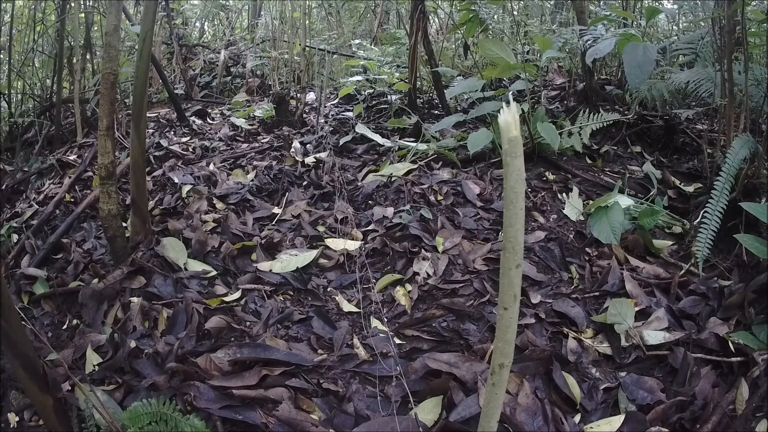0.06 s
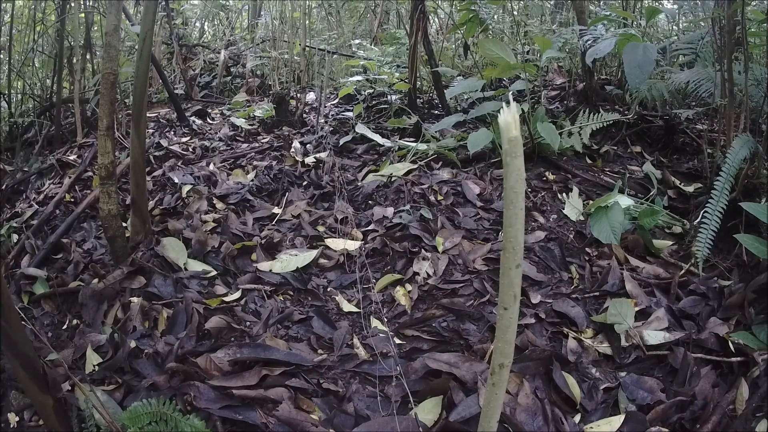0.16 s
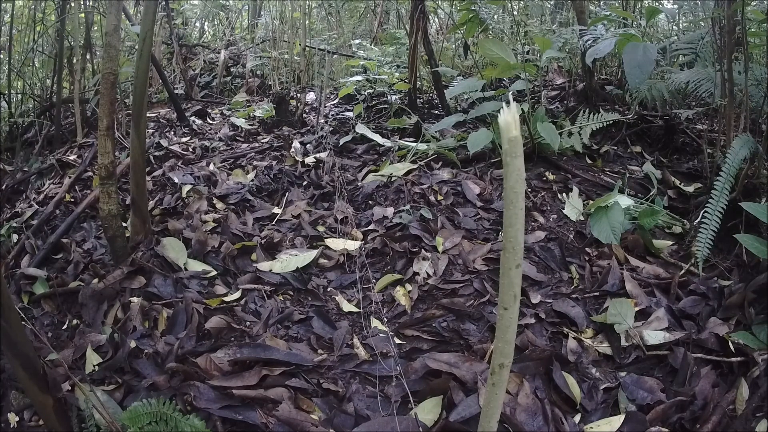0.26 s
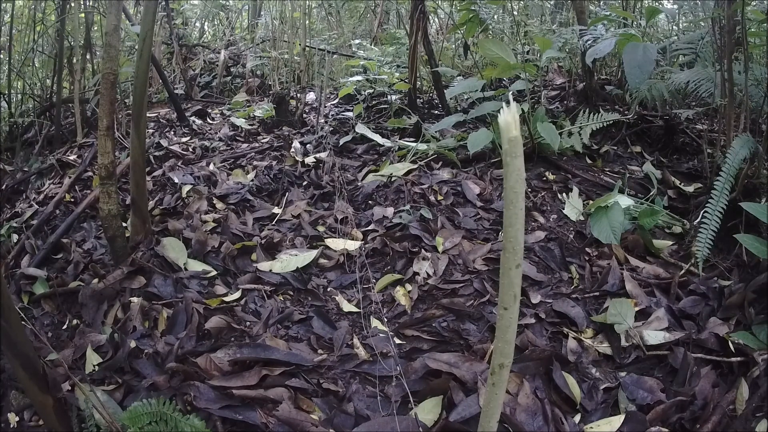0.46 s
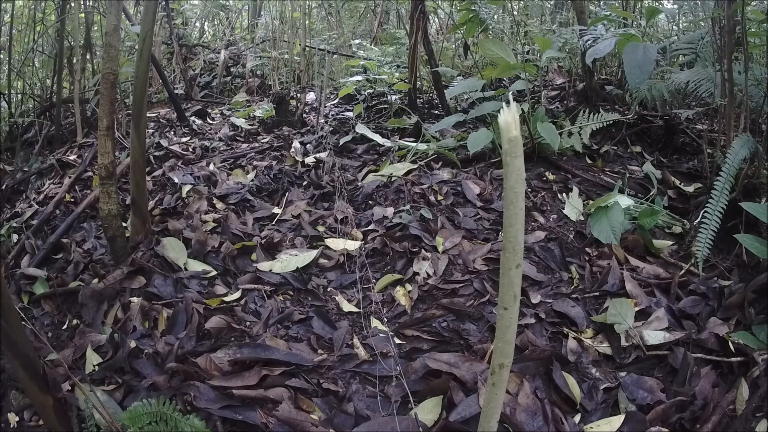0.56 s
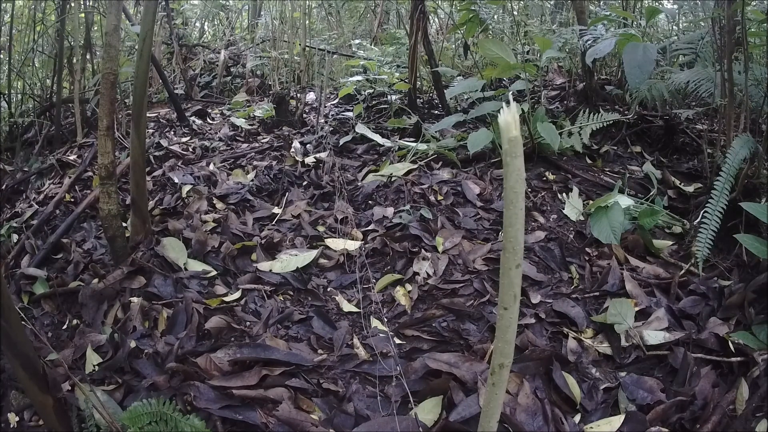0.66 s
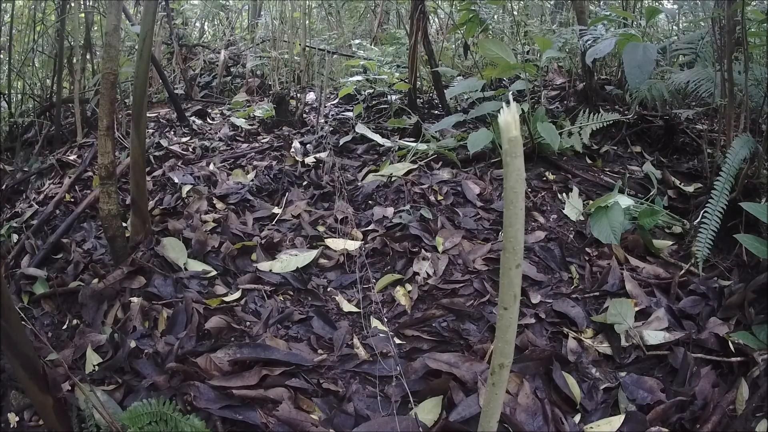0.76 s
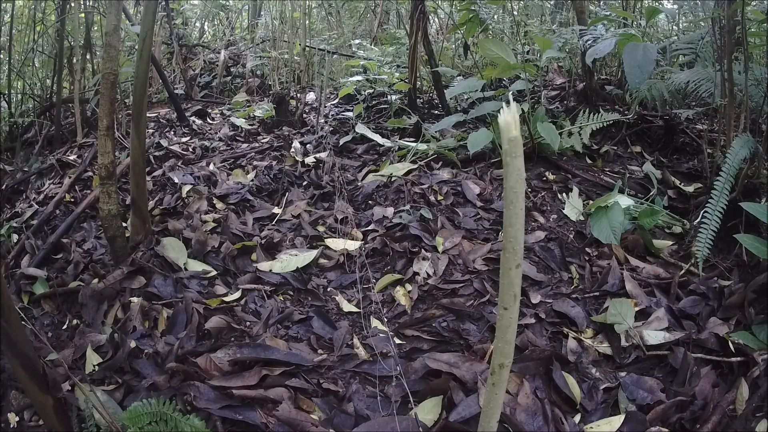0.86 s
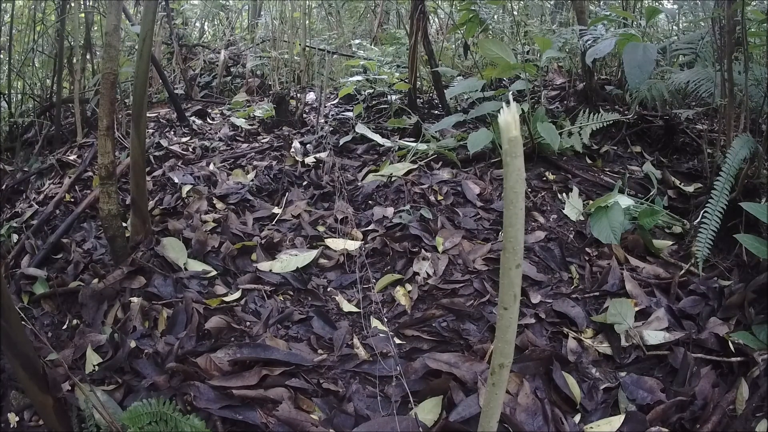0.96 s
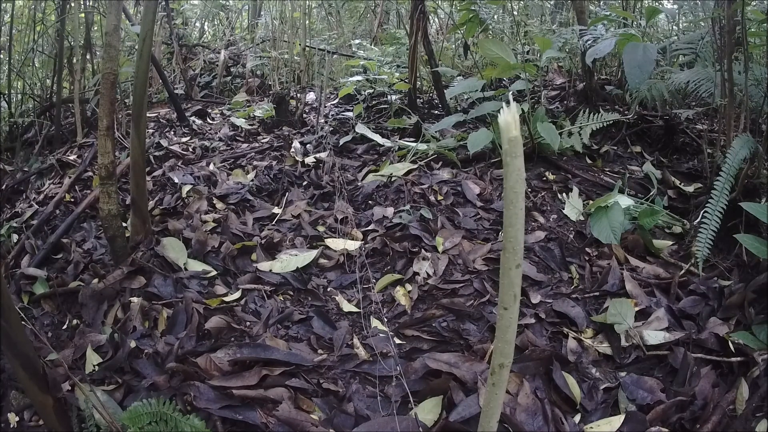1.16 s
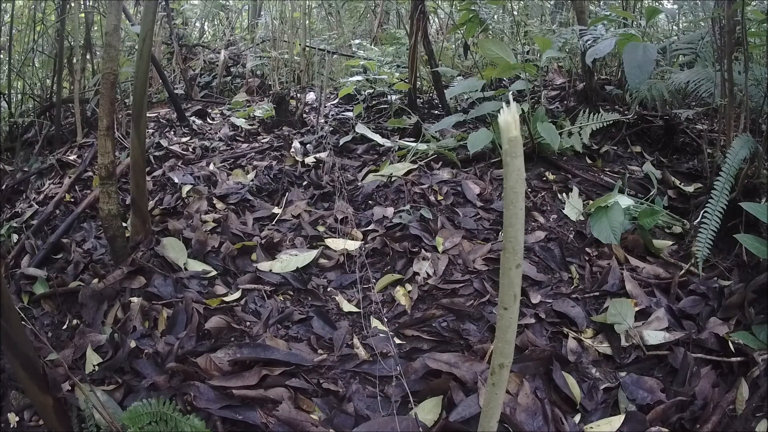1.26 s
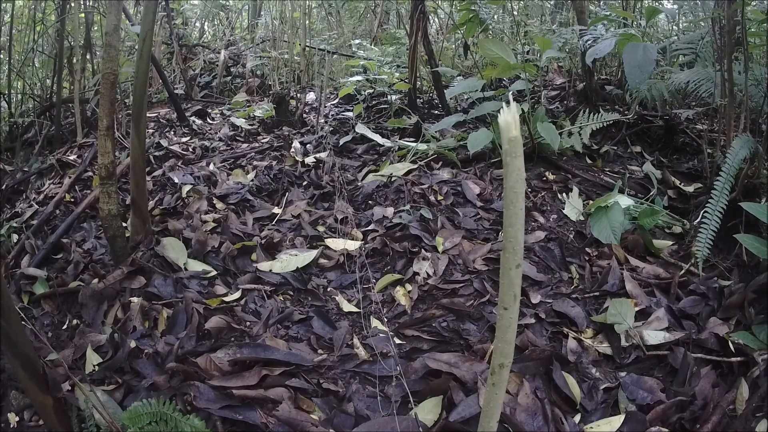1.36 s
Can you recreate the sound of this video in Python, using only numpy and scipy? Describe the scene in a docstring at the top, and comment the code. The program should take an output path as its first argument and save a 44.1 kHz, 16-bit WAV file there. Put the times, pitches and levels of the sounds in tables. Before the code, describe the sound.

A fowl-like bird gives two harsh squawks, then soft clucks, in a quiet forest.

```python
"""A forest hums with a low rumble, a faint hiss and far insects, while a cricket trills with its wings.
Far birds whistle from the start, and a few soft thuds come and go. Early on, a fowl-like bird on the
ground forces two harsh squawks from its voice box, with one cluck between them. The cricket stops,
and three more soft, low clucks follow. Toward the end the whistles grow louder and the insect chorus
fades. Trunks and leaves scatter every bird call into echoes."""
import sys
import numpy as np
from scipy import signal
from scipy.fft import rfft, irfft
from scipy.io import wavfile

SR = 44100
rng = np.random.default_rng(int(sys.argv[2]) if len(sys.argv) > 2 else 0)


def to_wav(s):
    """Save 16-bit WAV."""
    ch = np.atleast_2d(s).T  # columns
    pcm = np.round(np.clip(ch, -1, 1) * 32767)  # PCM
    wavfile.write(sys.argv[1], SR, pcm.astype(np.int16))


N = 61739
T = np.arange(N) / SR
CUTOFF_HZ = 15100


def from_db(db):
    """Turn decibels into a number to multiply by."""
    return 10 ** (np.asarray(db) / 20)


def unit_power(x):
    """Scale a sound to an average power of 1."""
    return x / np.sqrt(np.mean(x ** 2) + 1e-20)


def over_time(rows):
    """Join rows that start with a time into one curve for each other column."""
    times, *columns = np.transpose(rows)
    return [np.interp(T, times, column) for column in columns]


def at_hz(points, hz):
    """Read between a table's frequencies, with octaves evenly spaced."""
    frequencies, values = np.transpose(points)
    return np.interp(np.log(np.maximum(hz, 1)), np.log(frequencies), values)


def coloured(x, colour):
    """Turn each frequency up or down by a table of decibels."""
    return irfft(rfft(x) * from_db(at_hz(colour, np.fft.rfftfreq(N, 1 / SR))), N)


def drift(rate_hz):
    """A smooth random wobble, about 1 in size."""
    smoothing = 1 + (np.fft.rfftfreq(N, 1 / SR) / rate_hz) ** 2
    return unit_power(irfft(rfft(rng.standard_normal(N)) / smoothing, N))


def fade(start_s, end_s, rise_s, fall_s):
    """A rounded fade in and fade out."""
    fade_in = np.sin(np.pi / 2 * np.clip((T - start_s) / rise_s, 0, 1))
    fade_out = np.sin(np.pi / 2 * np.clip((end_s - T) / fall_s, 0, 1))
    return fade_in * fade_out


def phase_of(hz):
    """Add up a moving pitch into the angle of its wave."""
    return 2 * np.pi * np.cumsum(hz) / SR


def stereo_noise(likeness):
    """White noise for two ears: likeness 1 is the same in both, 0 is unrelated."""
    alike = np.clip(at_hz(likeness, np.fft.rfftfreq(N, 1 / SR)), -.99, .99)
    mid, side = rfft(rng.standard_normal((2, N)))
    return irfft(np.sqrt((1 + alike) / 2) * mid + np.sqrt((1 - alike) / 2) * side * [[1], [-1]], N)


# how alike the background is in both ears: frequency_hz, likeness
BACKGROUND_LIKENESS = [(40, 0.82), (150, 0.99), (400, 0.4), (1000, 0.34), (3000, 0.26), (5500, 0.15),
                       (8000, -0.11), (13000, -0.2)]
def background_noise(colour):
    """Coloured noise with its bass in the middle and its treble spread wide."""
    return unit_power(coloured(stereo_noise(BACKGROUND_LIKENESS), colour))


# the rumble's colour: frequency_hz, gain_db
RUMBLE_COLOUR = [(15, -30), (30, -14.5), (60, -4.5), (110, -1), (170, -1.5), (240, -9.5), (330, -16),
                 (600, -28), (1500, -66)]
def rumble():
    """Low noise whose level flutters."""
    level_db = -56.5 + 1.35 * drift(rate_hz=22)
    return from_db(level_db) * background_noise(RUMBLE_COLOUR)


# the hiss's colour: frequency_hz, gain_db
HISS_COLOUR = [(300, -2), (600, -0.5), (1200, -3), (1900, -8), (2600, -9), (3800, -10.5), (4800, -12.5),
               (6300, -16), (9000, -17), (12500, -18.5), (15000, -24.5)]
# its loudness: time_s, level_db
HISS_LOUDNESS = [(0, -62.5), (.18, -62), (.6, -61), (.76, -61), (.83, -61.5), (.92, -62.5), (1.12, -62),
                 (1.25, -61.5), (1.4, -63.5)]
def hiss():
    """The faint, nearly steady hiss of the forest."""
    level_db, = over_time(HISS_LOUDNESS)
    return from_db(level_db) * background_noise(HISS_COLOUR)


def cricket(pitch_hz=5365, strokes_per_s=61.2, stroke_db=6.5, level_db=-66, stop_s=.375):
    """Wing strokes pulse a high, wavering tone, then stop."""
    strokes = from_db(stroke_db * np.cos(2 * np.pi * strokes_per_s * T))
    hz = pitch_hz * (1 + 0.006 * drift(rate_hz=190))
    trill = unit_power(strokes * np.sin(phase_of(hz)))
    return from_db(level_db) * trill * fade(-1, stop_s, rise_s=.5, fall_s=0.013)


# the chorus's colour: frequency_hz, gain_db
CHORUS_COLOUR = [(4600, -18), (5100, -10), (5350, 2.5), (5550, -2), (5900, -24)]
# its loudness: time_s, level_db
CHORUS_LOUDNESS = [(0, -66.5), (.4, -70.5), (.8, -69), (1.1, -70), (1.26, -77.5), (1.4, -76)]
def insect_chorus():
    """Many far insects blur into one high band of noise that fades."""
    level_db, = over_time(CHORUS_LOUDNESS)
    return from_db(level_db) * background_noise(CHORUS_COLOUR)


def thin_insect(pitch_hz=3304, level_db=-82.5):
    """A faint, wavering insect tone, lower than the cricket."""
    hz = pitch_hz * (1 + 0.01434 * drift(rate_hz=154))
    return from_db(level_db) * unit_power(np.sin(phase_of(hz)))


# far whistles and their longer, softer echoes: start_s, length_s, pitch_hz, level_db
WHISTLE_NOTES = [(-.02, 0.088, 1216, -59.5), (0.31, 0.0733, 1236, -56.5), (0.623, 0.082, 1245, -62.5),
                 (0.774, 0.027, 1564, -61), (0.805, 0.029, 1266, -60), (0.813, 0.077, 1520, -67.5),
                 (0.952, 0.04, 1560, -59), (0.984, 0.038, 1268, -58), (0.99, 0.07, 1524, -65.5),
                 (1.14, 0.032, 1579, -55), (1.172, 0.03, 1250, -58.5), (1.18, 0.073, 1538, -61.5),
                 (1.335, 0.043, 1553, -51.5), (1.381, 0.038, 1232, -63.5), (1.375, .07, 1522, -55.5)]
def whistle(start_s, length_s, pitch_hz, level_db, fall_hz=112.9, settle_s=.012):
    """A far bird's pure note swells, slides down onto its pitch and fades."""
    slide = np.exp(-np.maximum(T - start_s, 0) / settle_s) - np.exp(-length_s / 2 / settle_s)
    loudness = fade(start_s, start_s + length_s, rise_s=0.024, fall_s=0.78 * length_s)
    return np.sqrt(2) * from_db(level_db) * np.sin(phase_of(pitch_hz + fall_hz * slide)) * loudness


# soft thuds amid the rumble: start_s, pitch_hz, level_db
SOFT_THUDS = [(.126, 190, -50.5), (.35, 83, -51.5), (0.551, 128, -51.5), (1.345, 142, -52.5)]
def thud(start_s, pitch_hz, level_db, length_s=.028):
    """A few dull, low waves that swell and die."""
    loudness = fade(start_s, start_s + length_s, rise_s=length_s / 4, fall_s=length_s)
    return np.sqrt(2) * from_db(level_db) * np.sin(2 * np.pi * pitch_hz * (T - start_s)) * loudness


SQUAWK_RISE_S, SQUAWK_FALL_S, VOICE_WOBBLE_HZ = 0.0052, 0.0048, 540

# the puff's colour: frequency_hz, gain_db
PUFF_COLOUR = [(300, -3.5), (550, 15), (900, -3), (1400, 14), (2000, 2.5), (2700, -22), (3400, -8),
               (4300, -13), (5500, -27)]
def puff(start_s, length_s=0.0072, gain_db=-39.5):
    """A rough burst as the bird's voice box opens for a squawk."""
    burst = unit_power(coloured(rng.standard_normal(N), PUFF_COLOUR))
    loudness = fade(start_s - SQUAWK_RISE_S / 2, start_s + length_s, SQUAWK_RISE_S, length_s / 2)
    return from_db(gain_db) * burst * loudness


def overtones(hz, multiples, throat, loudness):
    """Tones at multiples of a pitch, out of step, each made louder or softer by the throat."""
    sounding, tones = loudness > 0, np.zeros(N)
    tone_hz = np.outer(multiples, hz[sounding])
    phase = np.outer(multiples, phase_of(hz)[sounding]) + rng.uniform(0, 2 * np.pi, (len(multiples), 1))
    gains = from_db(at_hz(throat, tone_hz)) * (tone_hz < CUTOFF_HZ)
    tones[sounding] = np.sum(gains * np.sin(phase), axis=0)
    return tones * loudness


def rasp(hz, throat, loudness):
    """Breath noise that pulses with each wave of the voice."""
    breath = rng.standard_normal(N) * (1 + np.sin(phase_of(hz)))
    return unit_power(coloured(breath, throat)) * loudness


# one list per squawk: time_s, pitch_hz, base_tone_db, overtones_db, rasp_db (relative to the overtones)
SQUAWK_CURVES = [
    [(.2295, 1109, -29.5, -55, -12), (.231, 1150, -29.5, -45, -26), (.2335, 1402, -37, -45, -14),
     (.2358, 1252, -32, -46.5, -19), (.2375, 1068, -36.5, -39.5, -11), (.2452, 1060, -32, -42, -24),
     (.2472, 1092, -41, -52, -8), (.2492, 1715, -42, -41, -8), (.2515, 1595, -34.5, -41.5, -10),
     (.2535, 1085, -41.5, -40, -19), (.255, 625, -35.5, -45, -18), (.258, 530, -43.5, -51, -13)],
    [(.3632, 959.5, -42, -57, -13), (.366, 1107, -40, -51.5, -10), (.371, 1253, -42, -44, 0.5),
     (.3755, 1675, -51, -42, -7), (.3805, 1686, -59, -38, -14.5), (.384, 1666, -46, -37.5, -14.5),
     (.3862, 1646, -53.5, -41.5, -8), (.3895, 1200, -35, -42.5, -7), (.3915, 608, -41, -45.5, -4),
     (.395, 520, -40.5, -49, -7)],
]
# how throat and beak colour the sound, one list per squawk: frequency_hz, gain_db
THROAT_COLOURS = [
    [(500, -14), (1100, -2), (1450, 3), (1660, 9.5), (1900, 3.5), (2130, 1.5), (2450, -12.5), (2700, -1.5),
     (3000, -14.5), (3210, -1), (3420, -10), (3700, 0), (4000, -4), (4300, -6.5), (4680, -8), (5000, -27),
     (5700, -13.5), (6100, -27.5), (7300, -32.5), (8200, -37)],
    [(500, -12), (1100, 4), (1450, 1), (1700, 9.5), (2050, -7), (2600, -5.5), (2950, -11.5), (3370, -.5),
     (3650, -9.5), (4020, -0.5), (4280, -3), (4550, -10), (4800, -24.5), (5200, -29.5), (6100, -19),
     (6700, -25), (8200, -34.5)],
]
def squawk(curve, throat, half_tones_db=-11, band_hz=(414, 6300)):
    """After a puff, the voice box's shaky, raspy tone leaps up, breaks and drops low."""
    hz, base_tone_db, overtones_db, rasp_db = over_time(curve)
    start_s, end_s = curve[0][0], curve[-1][0]
    hz = hz * (1 + 0.027 * drift(VOICE_WOBBLE_HZ))
    loudness = fade(start_s - SQUAWK_RISE_S / 2, end_s + SQUAWK_FALL_S / 2, SQUAWK_RISE_S, SQUAWK_FALL_S)
    loudness *= from_db(1.82 * drift(VOICE_WOBBLE_HZ))
    multiples = np.arange(2, 14)
    upper = overtones(hz, multiples, throat, loudness)
    # tones halfway between the overtones make the voice harsh
    upper += from_db(half_tones_db) * overtones(hz, multiples - .5, throat, loudness)
    upper += from_db(rasp_db) * rasp(hz, throat, loudness)
    base_tone = np.sin(phase_of(hz)) * loudness
    voice = np.sqrt(2) * (from_db(base_tone_db) * base_tone + from_db(overtones_db) * upper)
    keep_middle = signal.butter(2, band_hz, "band", fs=SR, output="sos")
    return signal.sosfilt(keep_middle, voice + puff(start_s))


# the clucks: start_s, length_s, pitch_hz, base_tone_db, overtones_db
CLUCK_NOTES = [(0.291, 0.011, 461, -46, -58), (0.462, .018, 455, -41.5, -43.5),
               (0.522, .018, 444.8, -43.5, -50.5), (0.6078, .017, 427.8, -44.5, -45.5)]
# how the closed beak colours them: frequency_hz, gain_db
BEAK_COLOUR = [(450, -20), (900, -12), (1270, -5), (1800, -45), (2600, -25.5), (5000, -62)]
def cluck(start_s, length_s, pitch_hz, base_tone_db, overtones_db, sag_hz_per_s=2600, rasp_db=-14):
    """A few waves of a low, sagging, slightly raspy tone through the closed beak."""
    hz = pitch_hz - sag_hz_per_s * (np.clip(T - start_s, 0, length_s) - length_s / 2)
    hz *= 1 + .012 * drift(VOICE_WOBBLE_HZ)
    loudness = fade(start_s, start_s + length_s, rise_s=0.0027, fall_s=0.018)
    upper = overtones(hz, np.arange(2, 10), BEAK_COLOUR, loudness)
    upper += from_db(rasp_db) * rasp(hz, BEAK_COLOUR, loudness)
    base_tone = np.sin(phase_of(hz)) * loudness
    return np.sqrt(2) * (from_db(base_tone_db) * base_tone + from_db(overtones_db) * upper)


# how alike the echoes are in both ears: frequency_hz, likeness
ECHO_LIKENESS = [(500, 0.94), (1300, .93), (4000, 0.76), (8000, 0.13)]
def scatter(x, colour, ring_s, delay_s=0.003, build_s=0.0047):
    """Countless small echoes off trunks and leaves build up, dying by 60 dB in ring_s."""
    age_s = np.maximum(T - delay_s, 0)
    echoes = stereo_noise(ECHO_LIKENESS) * (1 - np.exp(-age_s / build_s)) * from_db(-60 * age_s / ring_s)
    return signal.fftconvolve(coloured(x, colour)[None], unit_power(echoes) / np.sqrt(N), axes=1)[:, :N]


# echoes from near and far trees: frequency_hz, gain_db (relative to the sound sent in)
NEAR_TREES = [(450, -13), (1050, -10), (1600, -5.5), (2200, -8), (4000, -4.5), (7000, -6)]
FAR_TREES = [(450, -20.5), (800, -6.5), (1000, -10.5), (1350, -9), (1700, -7), (2150, -8.5), (2700, 2.5),
             (3300, -5.5), (4020, 2), (4300, -2), (4700, -4.5), (7000, 2)]
def forest_echoes(fowl, far_birds):
    """Near trees echo the fowl briefly; far trees echo all the birds for longer."""
    near = scatter(fowl, NEAR_TREES, ring_s=0.064)
    return near + scatter(fowl + from_db(-2) * far_birds, FAR_TREES, ring_s=0.44)


def scene():
    """Birds and their echoes over insects, rumble, hiss and thuds."""
    fowl = sum(squawk(curve, throat) for curve, throat in zip(SQUAWK_CURVES, THROAT_COLOURS))
    fowl += sum(cluck(*row) for row in CLUCK_NOTES)
    far_birds = sum(whistle(*row) for row in WHISTLE_NOTES)
    echoes = forest_echoes(fowl, far_birds)
    insects = cricket() + insect_chorus() + thin_insect()
    thuds = sum(thud(*row) for row in SOFT_THUDS)
    return fowl + far_birds + echoes + insects + rumble() + hiss() + thuds


def record(dry):
    """Cut the highest treble away steeply."""
    return signal.sosfilt(signal.ellip(12, .1, 70, CUTOFF_HZ, fs=SR, output="sos"), dry)


dry = scene()
out = record(dry)
to_wav(out)
```